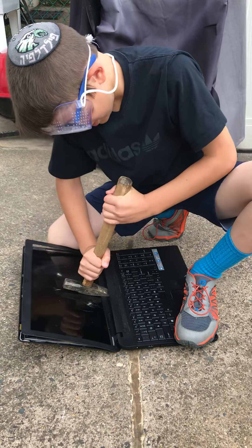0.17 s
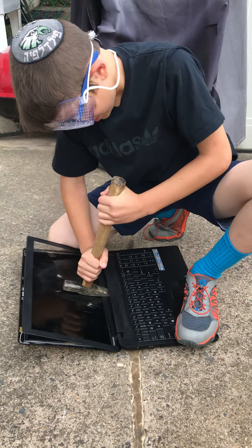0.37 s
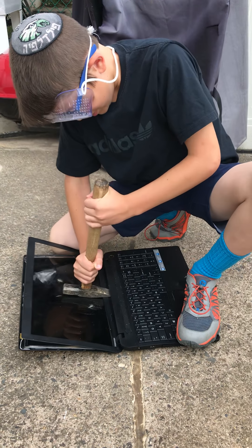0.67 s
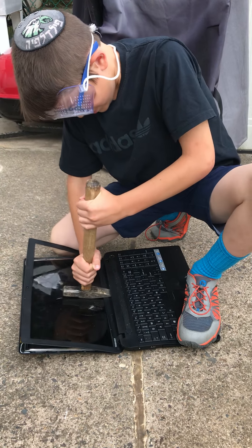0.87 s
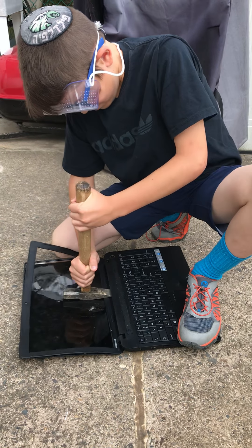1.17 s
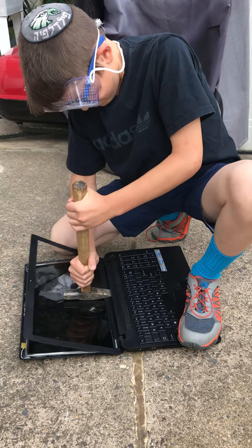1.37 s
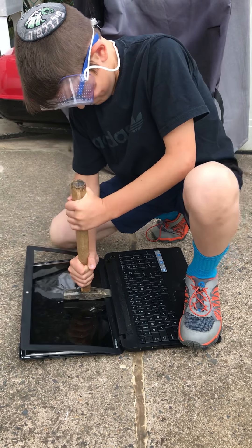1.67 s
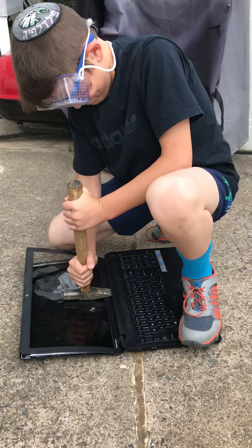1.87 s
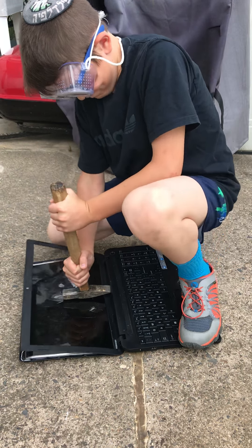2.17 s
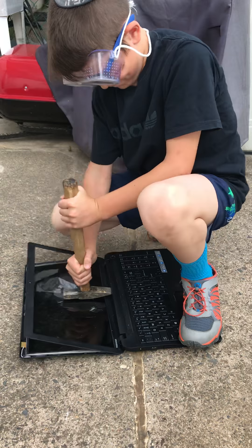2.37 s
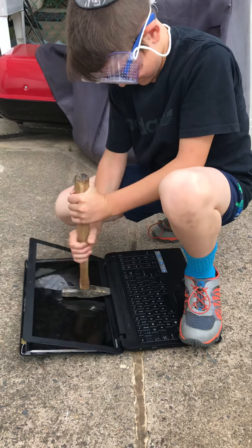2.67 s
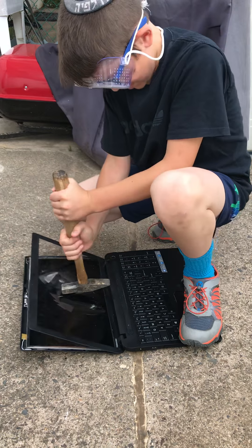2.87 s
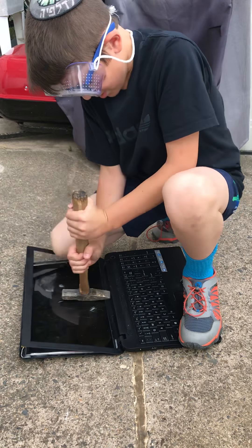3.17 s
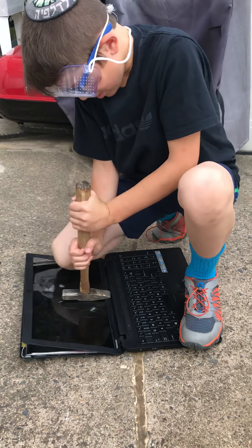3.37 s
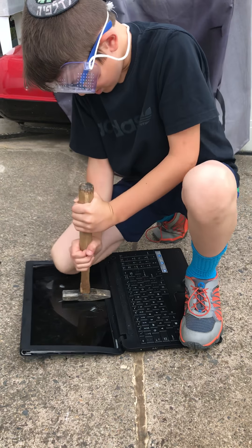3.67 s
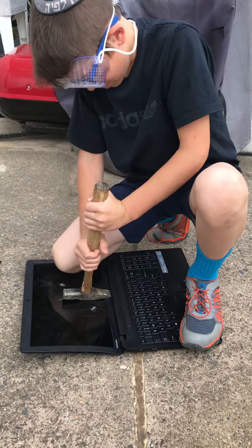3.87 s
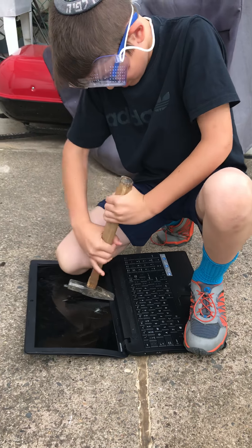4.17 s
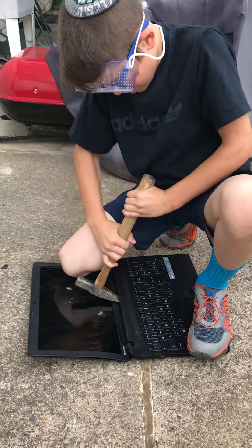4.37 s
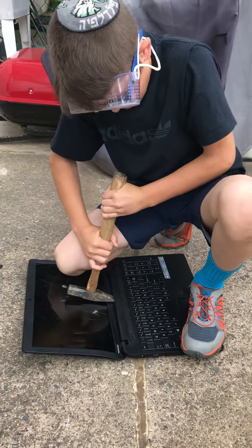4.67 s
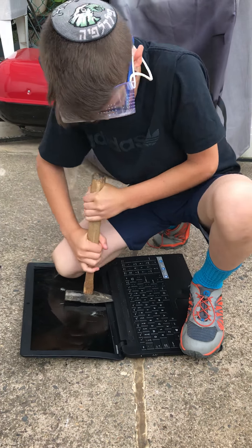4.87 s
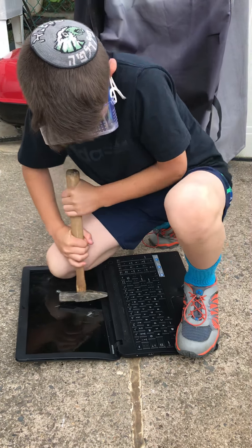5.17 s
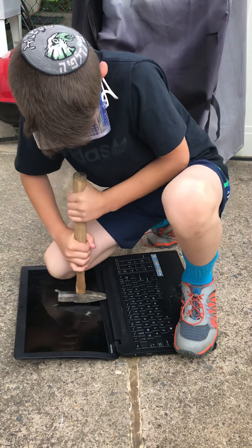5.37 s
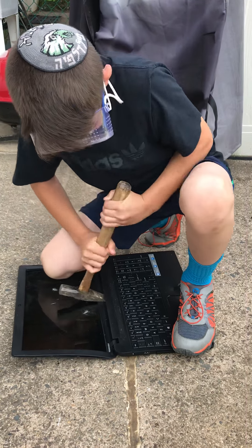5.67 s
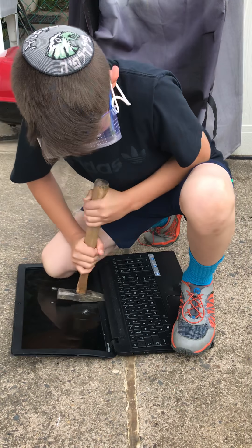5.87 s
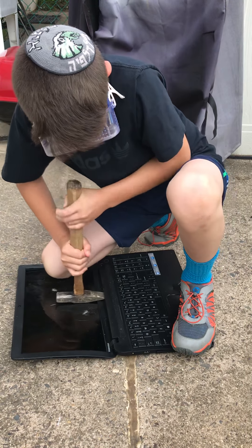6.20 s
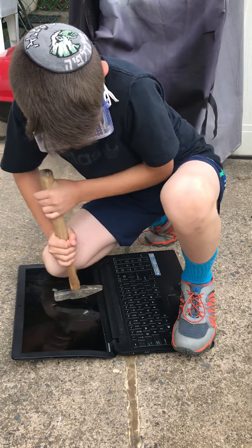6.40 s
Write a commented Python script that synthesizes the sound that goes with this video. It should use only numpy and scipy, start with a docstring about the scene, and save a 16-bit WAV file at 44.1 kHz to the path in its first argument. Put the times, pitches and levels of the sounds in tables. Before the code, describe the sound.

A steel hammer head is pressed and rocked on a broken laptop screen. Small glass ticks come first, then a cluster of loud, sharp cracks that knock through the plastic lid, with a short gritty scrape. More cracks follow at uneven gaps, with splinters ticking and faint rubbing between them. The sound is close and fairly dry, outdoors over a low, distant machinery hum.

```python
"""A concrete driveway, where a hammer head is pressed and rocked on a broken laptop screen.
The panel gives way in sharp cracks that knock through the plastic lid. Between them splinters tick,
hairline cracks creep, and the steel rubs, grinds and squeaks on the glass. A faint whine passes once.
Distant machinery hums under the open air, and the yard answers with faint echoes."""
import sys
import numpy as np
from scipy import signal
from scipy.fft import rfft, irfft
from scipy.io import wavfile
from scipy.ndimage import uniform_filter1d

SR = 44100
rng = np.random.default_rng(int(sys.argv[2]) if len(sys.argv) > 2 else 0)


def wrap_up_sound(samples):
    """Save the sound to the file named by the first command line argument, as 16-bit audio."""
    columns = np.atleast_2d(samples).T
    # keep every value between -1 and 1, then stretch to whole-number steps
    tamed = np.clip(columns, -1, 1)
    steps = np.round(tamed * 32767).astype(np.int16)
    wavfile.write(sys.argv[1], SR, steps)


N = 288237


def amp(db):
    """Decibels to gain."""
    return 10 ** (np.asarray(db) / 20)


def unit_energy(x):
    """Scales to an energy of one."""
    return x / np.sqrt(np.sum(x ** 2) + 1e-20)


def unit_rms(x):
    """Scales to an rms of one."""
    return unit_energy(x) * np.sqrt(len(x))


def curve_at(points, hz):
    """Reads a curve on a log-frequency axis."""
    f, value = np.transpose(points)
    return np.interp(np.log(hz + 1), np.log(f + 1), value)


def lift(modes, hz):
    """The dB that a set of resonances adds at each frequency."""
    return sum(db / (1 + (2 * (hz - f) / width) ** 2) for f, width, db in modes)


def automation(points):
    """Reads a fader curve at every sample."""
    return np.interp(np.arange(N) / SR, *np.transpose(points))


def add(mix, start, sound):
    """Lays a sound into the mix, start seconds in."""
    part = mix[max(round(start * SR), 0):][:len(sound)]
    part += sound[:len(part)]


def coloured(x, eq, modes=()):
    """Gives a scene-long signal an EQ and resonances, at rms one."""
    hz = np.fft.rfftfreq(N, 1 / SR)
    return unit_rms(irfft(rfft(x) * amp(curve_at(eq, hz) + lift(modes, hz)), N))


def drift(rate_hz):
    """Smooth random motion of rms one, rolling off above rate_hz."""
    rolloff = np.exp(-(np.fft.rfftfreq(N, 1 / SR) / rate_hz) ** 2)
    return unit_rms(irfft(rfft(rng.standard_normal(N)) * rolloff, N))


def ring(x, eq_db):
    """Rings a short burst through a minimum-phase body with this EQ, and fades it out."""
    log_gain = np.log(amp(np.r_[eq_db, eq_db[-2:0:-1]]))
    body = np.exp(np.conj(signal.hilbert(log_gain)))
    fade = np.hanning(2 * len(x))[len(x):]
    return irfft(rfft(x) * body[:len(eq_db)]) * fade


def burst(t, t60, rise_s, grain_db):
    """A dying volley of tiny fractures, with its energy spread evenly over pitch."""
    envelope = amp(-60 * t / t60) * (1 - np.exp(-(t + 1 / SR) / rise_s))
    clumps = amp(grain_db * unit_rms(uniform_filter1d(rng.standard_normal(len(t)), size=25)))
    volley = rng.standard_normal(len(t)) * clumps * envelope
    power = uniform_filter1d(abs(rfft(volley)) ** 2, size=len(t) // 160 + 16)
    return unit_energy(ring(volley, -10 * np.log10(power + 1e-12)))


def fracture(t, snap_share, snap_t60, rattle_t60, bounce_s, bounce_db, rattle_treble_db=0):
    """The instant snap, its bounce off nearby surfaces, and the rattle of the lid."""
    snap_share = np.clip(snap_share, .1, .98)
    snap = burst(t, snap_t60, rise_s=.00005, grain_db=1)
    smeared = burst(t, snap_t60 * 2, rise_s=.0002, grain_db=1)
    bounce = amp(bounce_db) * np.interp(t - bounce_s, t, smeared, left=0)
    shelf_db = np.interp(np.fft.rfftfreq(len(t), 1 / SR), [3000, 14000], [0, rattle_treble_db])
    rattle = ring(burst(t, rattle_t60, rise_s=.0004, grain_db=3), shelf_db)
    return np.sqrt(snap_share) * (snap + bounce) + np.sqrt(1 - snap_share) * rattle


def grit(per_s, spread_db):
    """Sparse slips of uneven size."""
    sizes = amp(spread_db * np.minimum(rng.exponential(1, N), 4))
    return unit_rms(sizes * rng.standard_normal(N) * (rng.random(N) < per_s / SR))


# Tone of the open-air bed: (frequency [Hz], gain [dB])
AIR_EQ = [(25, -23), (50, 6), (127, 0), (200, -4.5), (280, -7), (400, -18.5), (600, -21.5), (1000, -19),
          (1500, -24.5), (3300, -30.5), (6000, -37), (8500, -53), (10500, -55), (13000, -44), (16000, -55)]
# Drones of distant machinery: (pitch [Hz], level before the low-end fader [dB], wander [Hz])
MACHINE_DRONES = [(57.2, -50, 2.36), (112.6, -51.5, 2.87), (120.3, -53, 1.52), (236.3, -55.5, 3.664)]
# Fader on the rumble and the drones: (time [s], gain [dB])
LOW_END_FADER = [(0, -0.5), (1.05, 1), (2.2, -4), (3.1, -1.1), (4.3, .5), (4.65, -3), (5.3, 1.5),
                 (6.53, 1.5)]
def outdoors(air_db=-45, swell_db=-0.25):
    """Neighbourhood air and the wavering hum of distant machinery; the low end swells and sinks."""
    air, hum = amp(air_db) * coloured(rng.standard_normal(N), AIR_EQ), np.zeros(N)
    for hz, db, wander in MACHINE_DRONES:
        peak = np.sqrt(2) * amp(db + 2 * drift(8.3))
        pitch = hz + wander * drift(8.85)
        hum += peak * np.sin(2 * np.pi * np.cumsum(pitch) / SR)
    rumble = signal.sosfiltfilt(signal.butter(2, 200, fs=SR, output="sos"), air)
    fader = amp(automation(LOW_END_FADER) + swell_db * drift(4.5))
    return air - rumble + (rumble + hum) * fader


# Tone of steel sliding on glass: (frequency [Hz], gain [dB])
RUB_EQ = [(500, -37.5), (1500, -13.5), (3500, 1), (5000, -4.5), (7000, -4), (10500, -10.5), (13000, -7),
          (16000, -13)]
# How hard the hammer head is worked; rides the rub and the crackle: (time [s], gain [dB])
HAMMER_EFFORT = [(0, -7.5), (1.18, -0.5), (1.31, -8), (2.09, -15), (2.2, 0), (3.62, -0.5), (4.24, -9),
                 (4.62, 0), (4.87, -9), (5.04, -1), (5.6, 2.5), (6.05, -5), (6.53, -17)]
def rubbing(base_db=-63.5):
    """Steel slides on glass: a soft hiss with specks of grit in it."""
    specks = .3 * grit(per_s=150, spread_db=4)
    hiss = coloured(rng.standard_normal(N) + specks, RUB_EQ)
    return hiss * amp(base_db + automation(HAMMER_EFFORT))


def crackle(base_db=-65.5, effort_depth=.25, per_pitch_per_s=3, spread_db=14, size=900):
    """Hairline cracks creep: tiny ticks at sixteen pitches, a little louder under more effort."""
    t, hz, out = np.arange(size) / SR, np.fft.rfftfreq(size, 1 / SR), np.zeros(N)
    eq_db = curve_at([(500, -18), (2500, 3.5), (6000, -2.5), (16000, -8)], hz)
    for piece_hz in np.geomspace(2200, 14000, num=16):
        triggers = amp(-spread_db * rng.random(N)) * (rng.random(N) < per_pitch_per_s / SR)
        tick = fracture(t, snap_share=.7, snap_t60=.002, rattle_t60=.025, bounce_s=.004, bounce_db=-14)
        piece_db = lift([(piece_hz, .35 * piece_hz, 12)], hz)
        out += signal.oaconvolve(triggers, unit_energy(ring(tick, eq_db + piece_db)))[:N]
    return unit_rms(out) * amp(base_db + effort_depth * automation(HAMMER_EFFORT))


# Glass splinters that stand out of the crackle: (time [s], energy [dB], brightness [dB])
SPLINTER_CUES = [(0.076, -27.5, -2), (0.2057, -20.5, -2), (0.221, -13.5, 9), (0.4017, -19.5, 7),
                 (0.4758, -17, -0.5), (0.525, -24, 2), (0.5726, -15, -9.5), (0.6243, -18.5, -2.5),
                 (1.1162, -20, -9), (1.313, -21, 5), (1.324, -17.5, -5), (1.453, -24.5, -5),
                 (2.2194, -20.5, -5), (2.272, -19.5, 1.5), (2.5221, -18.5, -46), (2.6518, -17.5, -16),
                 (3.2254, -19, -31), (3.5802, -22.5, 15), (3.6004, -17, 15), (3.605, -23, 12),
                 (3.638, -15.5, 10), (3.659, -14.5, -4), (3.689, -14.5, 3.5), (3.9103, -23.5, -16),
                 (3.9974, -21, 2.5), (4.0933, -24.5, -7), (4.188, -24, -16.5), (4.2402, -23, 3),
                 (4.3742, -19.5, 1.5), (4.4257, -25, 10), (4.4488, -23, 7), (4.897, -23, -7),
                 (5.039, -25, -6), (5.102, -22.5, -7), (5.3191, -15, 7), (5.4276, -17.5, -16),
                 (6.312, -23, 17), (6.338, -23, 6)]
def splinters(size=4096):
    """Small pieces of glass tick without moving the lid much; each has resonances of its own."""
    t, hz, out = np.arange(size) / SR, np.fft.rfftfreq(size, 1 / SR), np.zeros(N)
    for start, db, bright in SPLINTER_CUES:
        treble = [(7500, bright + 1), (10500, bright - 2), (14000, bright - 1)]
        eq_db = curve_at([(200, -25), (800, 5), (1700, 3.5), (3800, 4.5)] + treble, hz)
        modes = [(f, .07 * f, 6) for f in np.exp(rng.uniform(np.log(1500), np.log(14000), size=6))]
        # bright ticks come from the smallest pieces and are over at once
        snap_share = np.interp(bright, [-15, 3], [.35, .85])
        tick = fracture(t, snap_share, snap_t60=.0038, rattle_t60=.047, bounce_s=.012, bounce_db=-11.5)
        add(out, start, amp(db) * unit_energy(ring(tick, eq_db + lift(modes, hz))))
    return out


# Slips of the hammer head: (time [s], length [s], start pitch [Hz], end pitch [Hz], level [dB])
SQUEAK_CUES = [(0.226, 0.099, 4650, 3200, -56), (0.662, .025, 1080, 830, -50),
               (3.256, 0.043, 3600, 3950, -47.5)]
def squeaks(wobble=.018, steady_to_chatter=0.63):
    """The head slips on the glass in faint, rough squeaks that glide in pitch."""
    out = np.zeros(N)
    for start, length, from_hz, to_hz, db in SQUEAK_CUES:
        n = round(length * SR)
        pitch = np.linspace(from_hz, to_hz, n) * (1 + wobble * drift(440)[:n])
        tone = np.sin(2 * np.pi * np.cumsum(pitch) / SR)
        chatter = unit_rms(steady_to_chatter + drift(350)[:n])
        add(out, start, amp(db) * chatter * tone * signal.windows.tukey(n, .5))
    return out


# Spells in which shards grind, under the dragged head or crumbling after a big break: (start [s], end [s],
# level [dB])
GRIND_CUES = [(0.438, 0.553, -55.5), (1.084, 1.143, -64), (2.278, 2.359, -29.5), (2.293, 2.48, -52),
              (3.165, 3.33, -47.5), (3.61, 3.713, -49), (4.228, 4.277, -44.5), (4.93, 5.037, -47.5),
              (5.962, 6.094, -59.5), (6.257, 6.378, -58)]
# Tone of the grind: (frequency [Hz], gain [dB])
GRIND_EQ = [(400, -8.5), (1500, -3), (2700, 2.5), (3700, -2), (5800, 2.5), (7000, -4), (8500, -4.5),
            (10500, -8.5), (13000, -9), (16000, -11)]
# Resonances of the dragged shards: (frequency [Hz], width [Hz], boost [dB])
SHARD_MODES = [(1600, 300, 6), (3750, 600, 6), (8400, 900, 3)]
def grinding():
    """Shards drag under the head, or crumble after a big break, in coarse spells of dense, uneven slips."""
    force = np.zeros(N)
    for start, end, db in GRIND_CUES:
        add(force, start, amp(db) * signal.windows.tukey(round((end - start) * SR), .8))
    slips = grit(per_s=6000, spread_db=2.5) * amp(2.8 * drift(90))
    return force * coloured(slips, GRIND_EQ, SHARD_MODES)


# Breaks in the panel; weight and brightness tilt the EQ going down and up from pivot_hz:
# (time [s], energy [dB], lowest note of the flexing part [Hz], weight [dB/octave],
#  brightness [dB/octave], snap share [0-1], ring of the loosened piece [Hz])
CRACK_CUES = [(0.7444, -10.5, 900, -7, 0, 0.94, 8700), (1.2596, -13, 1340, -0.5, -6, 0.05, 5780),
              (1.548, -12.5, 400, -4.5, -11, .17, 1470), (1.5705, -6.5, 667, 5, -7, 0, 1460),
              (1.6049, 5, 600, -3.5, -4, 0.28, 1610), (1.8761, 2, 500, -6.5, -2.5, 0.54, 1580),
              (1.9579, 2, 370, 2, -6, 0.43, 800), (1.9627, 14.5, 470, -2, -5, 0.47, 687),
              (2.0167, -2.4, 400, -3, -3, 0.6, 2400), (2.1591, -6, 400, -5, -5, 0.66, 7040),
              (2.2916, 13, 750, -4.5, -0.5, 0.08, 2960), (2.2955, 12, 700, 3, -2, 0.46, 857),
              (2.3015, 11.5, 550, -5.5, -8, 0.5, 6030), (2.7357, 12, 573, 3, -5, 0, 323),
              (2.951, -15, 750, 4, -10, 0.6, 830), (2.9687, -11.5, 1040, 7.5, 2.5, .5, 1430),
              (2.9762, -3, 450, -1, -14.5, .19, 1570), (3.028, -13, 400, -2.5, -16, 0, 1600),
              (3.497, -6, 400, -4, -7, .13, 3360), (3.5052, 6, 700, -5.5, -6, 0.1, 5500),
              (3.5101, -1.5, 400, -4, -11, 0, 3700), (3.5202, 0.5, 352, -5.5, -11.5, 0.4, 7900),
              (3.7969, -7.5, 351, -6, -6, 0.4, 5900), (4.2562, -5.5, 510, 1.5, -10, 0.05, 4580),
              (4.9382, -2, 325, 2, -6, 0.15, 491), (4.9991, -5.5, 650, 6, -10, 0.7, 507),
              (5.0101, -5, 1050, 8, -6.5, 0.4, 3530), (5.2764, 10.8, 1860, 4.5, -13.5, 0.93, 4100),
              (5.4788, -4.5, 500, -5, 1.5, 0.7, 3720), (5.5177, 4.5, 945, 1.5, -3.5, 0.42, 815),
              (5.7176, -7.5, 920, 8.5, -23, 0.36, 943), (6.0326, -10, 900, 4, -12, 0.2, 1970),
              (6.062, -11, 445, 3.5, -4.5, 0, 5900), (6.066, -8, 276, 1, -8.5, 0.5, 834),
              (6.3594, -8, 284, 2.5, -4, 0.4, 580), (6.3635, 9, 680, 4, -5.5, 0.39, 501)]
# Body of the plastic lid; negative rows only trim the boosts: (frequency [Hz], width [Hz], boost [dB])
LID_MODES = [(331, 46, 5.5), (505, 16, 0), (711, 22, -5.5), (858, 27, 5.5), (1060, 100, 3), (1520, 54, 6.5),
             (1676, 34, -8.5), (2115, 160, 2.5), (2574, 38, 1), (2843, 28, 2), (3230, 95, 4),
             (3664, 80, -5), (3930, 200, 4.5), (5570, 66, 6.5), (6650, 150, 6)]
def cracks(pivot_hz=3170, cut_db_per_octave=20, piece_db=11.5, size=8192):
    """Each break shakes the lid: the larger the part that flexes, the deeper the knock."""
    t, hz, out = np.arange(size) / SR, np.fft.rfftfreq(size, 1 / SR), np.zeros(N)
    octaves = np.log2((hz + 1) / pivot_hz)
    for start, db, lowest_hz, weight, bright, snap_share, piece_hz in CRACK_CUES:
        # a flexing part radiates little below its lowest note
        low_cut_db = cut_db_per_octave / 6 * np.log2(1 + (lowest_hz / (hz + 20)) ** 6)
        tilt_db = np.where(octaves < 0, weight, bright) * np.minimum(abs(octaves), 4)
        piece_mode = (piece_hz, 33 + 0.13 * piece_hz, piece_db)
        modes_db = np.maximum(lift(LID_MODES, hz), lift([piece_mode], hz))
        # large, ragged breaks run longer than clean ones
        snap_t60 = 0.01 * amp(0.16 * db - 4 * snap_share)
        # the lid rattles, and the driveway throws the snap back
        hit = fracture(t, snap_share, snap_t60, rattle_t60=.05,
                       bounce_s=.0085, bounce_db=-27.5, rattle_treble_db=-3)
        add(out, start, amp(db) * unit_energy(ring(hit, tilt_db - low_cut_db + modes_db)))
    return out


# Narrow noise bands of the whine: (centre [Hz], level before flutter [dB])
WHINE_BANDS = [(1760, -60), (2300, -70), (2780, -64.5), (5890, -65), (6880, -79)]
def faint_whine(start=5.34, length=0.46, width_hz=280, flutter_db=4.0):
    """A brief, faint whine of a few fuzzy, fluttering narrow noise bands."""
    t, out = np.arange(round(length * SR)) / SR, np.zeros(N)
    for hz, db in WHINE_BANDS:
        fuzz = drift(width_hz) + 1j * drift(width_hz)
        flutter = amp(flutter_db * drift(15))
        band = ((fuzz * flutter)[:len(t)] * np.exp(2j * np.pi * hz * t)).real
        add(out, start, amp(db) * band * signal.windows.tukey(len(t), .4))
    return out


def yard(x, t60, treble_t60, wet_db):
    """Diffuse echoes off the yard, with separate decay times for the mids and the treble."""
    hz, t, noise = signal.stft(rng.standard_normal(SR), SR, nperseg=256)
    decay_s = curve_at([(1500, t60), (14000, treble_t60)], hz)[:, None]
    tail = signal.istft(noise * amp(-60 * t / decay_s), SR, nperseg=256)[1]
    fade_in = np.clip(np.arange(len(tail)) / SR / 0.019 - .5, 0, 1)
    return amp(wet_db) * signal.fftconvolve(x, unit_energy(tail * fade_in))[:N]


def scene():
    """Mono mix: dry friction, the whine, the outdoor bed, and the breaking screen with its echoes."""
    screen = crackle() + splinters() + cracks()
    near = yard(screen, t60=0.081, treble_t60=0.067, wet_db=-21.0)
    far = yard(screen, t60=0.34, treble_t60=0.37, wet_db=-29.5)
    friction = rubbing() + squeaks() + grinding()
    return (friction + faint_whine() + outdoors() + screen + near + far)[None]


def record(dry, low_cut_hz=38, high_cut_hz=16100):
    """The microphone drops the deepest bass and rounds off the loudest peaks; a high cut follows."""
    trimmed = signal.sosfilt(signal.butter(4, low_cut_hz, "high", fs=SR, output="sos"), dry)
    rounded = trimmed / (1 + abs(trimmed) ** 6) ** (1 / 6)
    high_cut = signal.firwin(255, high_cut_hz, window=("kaiser", 8), fs=SR)
    return signal.oaconvolve(rounded, high_cut[None], "same")


dry = scene()
out = record(dry)
wrap_up_sound(out)
```